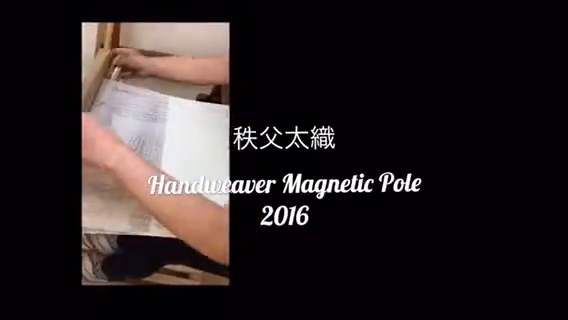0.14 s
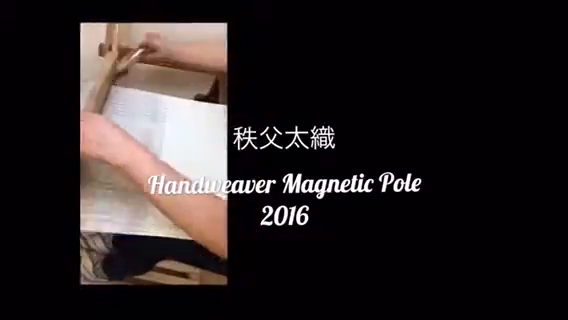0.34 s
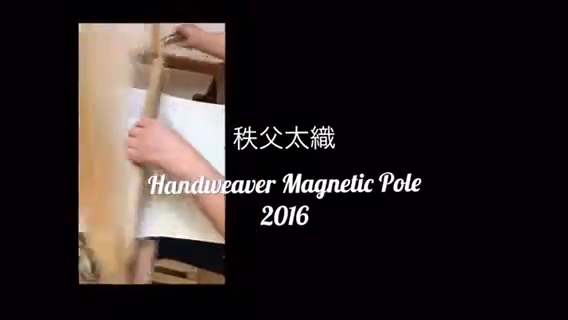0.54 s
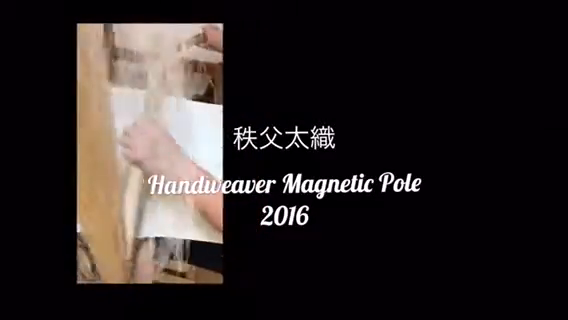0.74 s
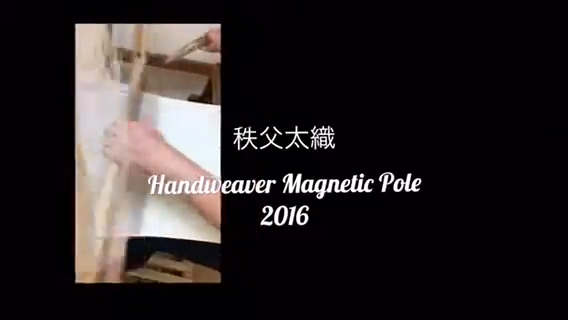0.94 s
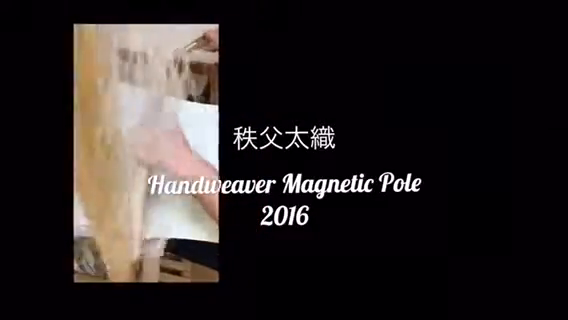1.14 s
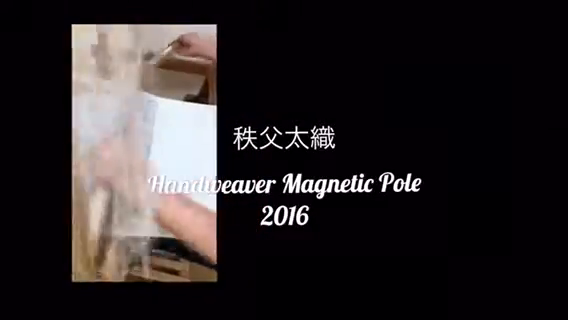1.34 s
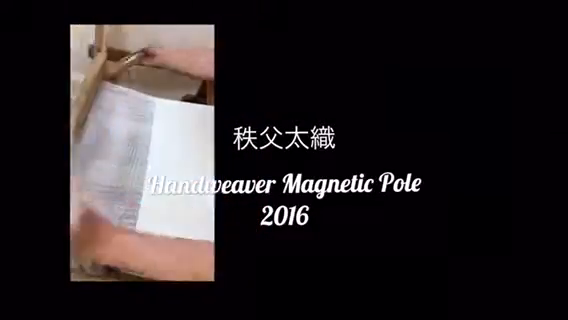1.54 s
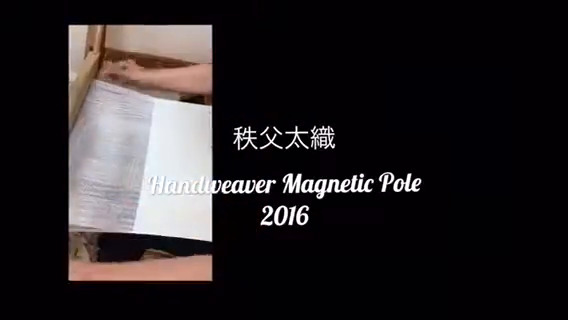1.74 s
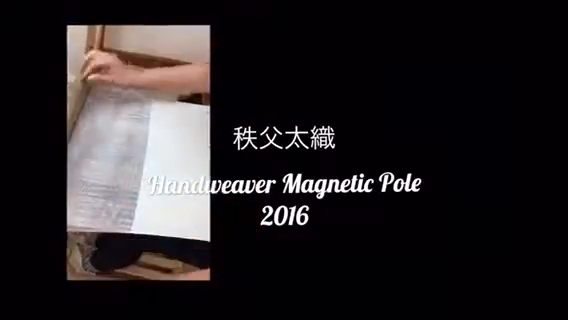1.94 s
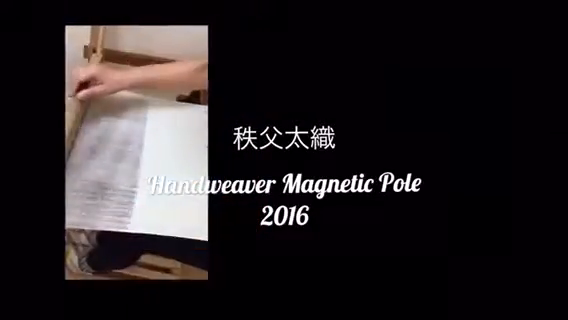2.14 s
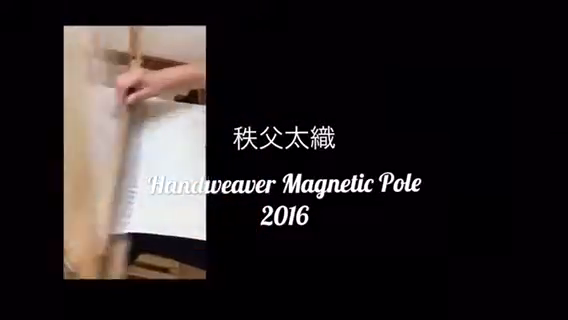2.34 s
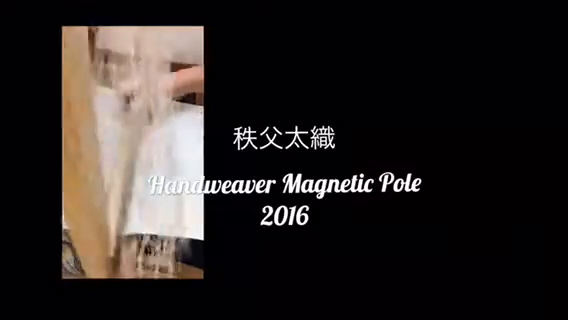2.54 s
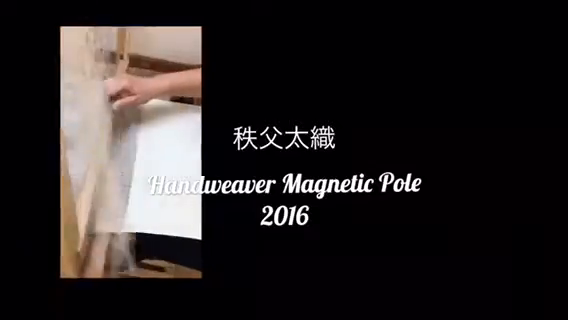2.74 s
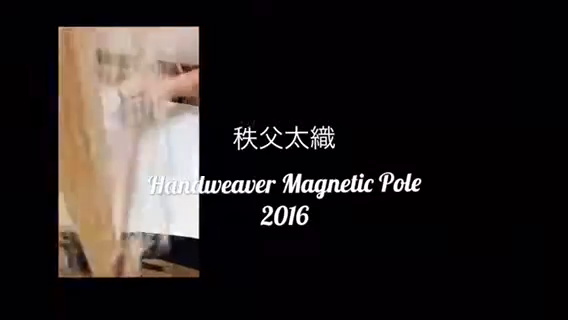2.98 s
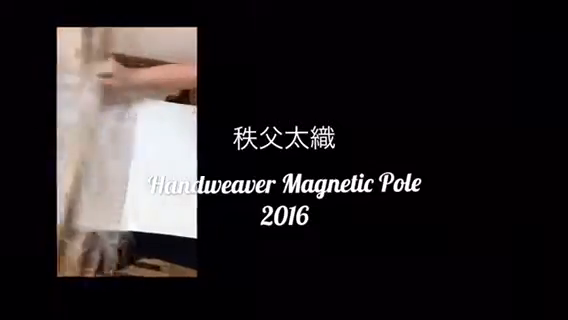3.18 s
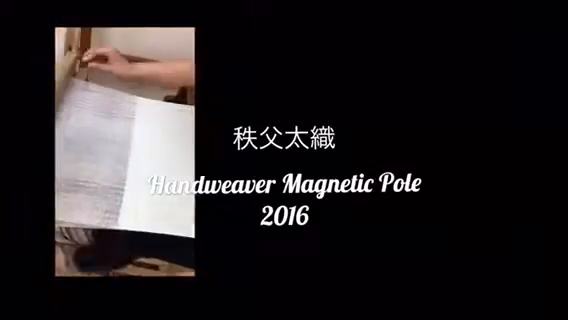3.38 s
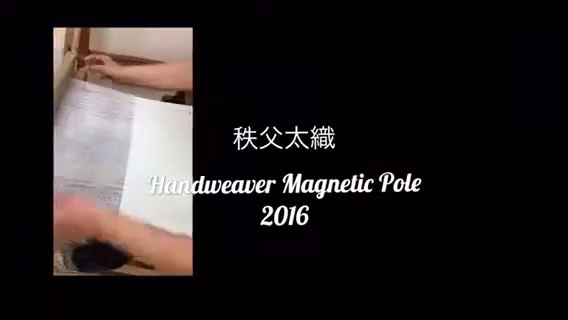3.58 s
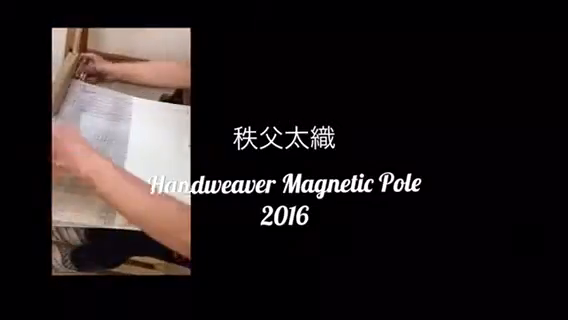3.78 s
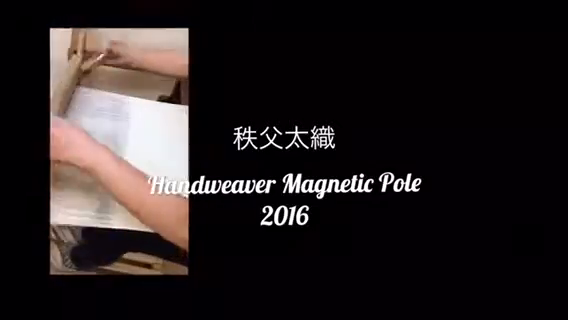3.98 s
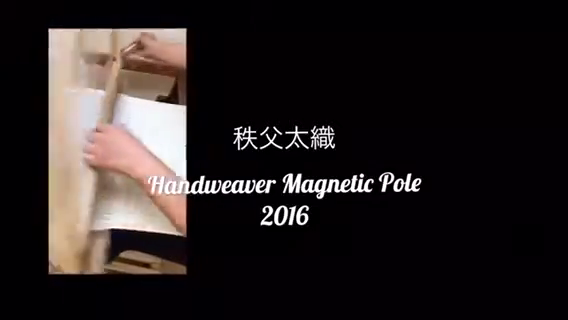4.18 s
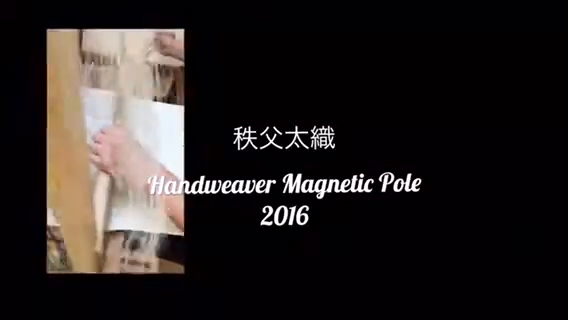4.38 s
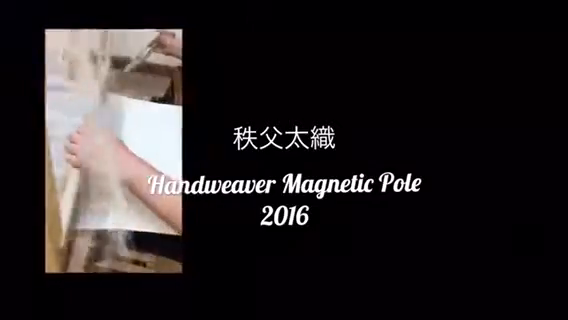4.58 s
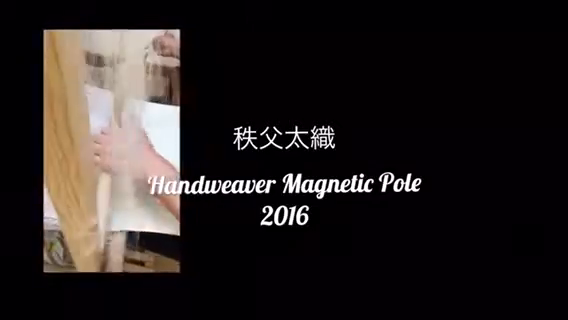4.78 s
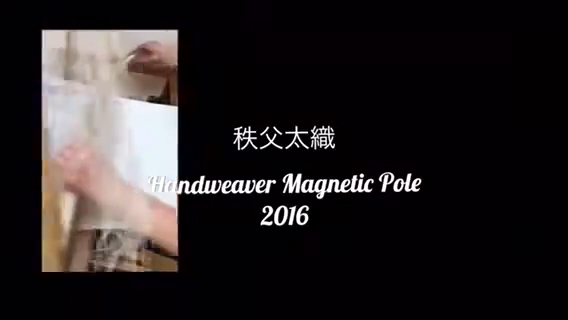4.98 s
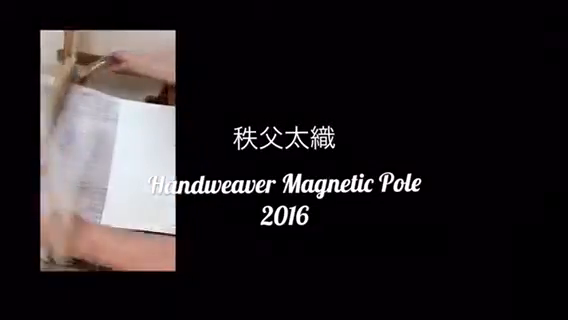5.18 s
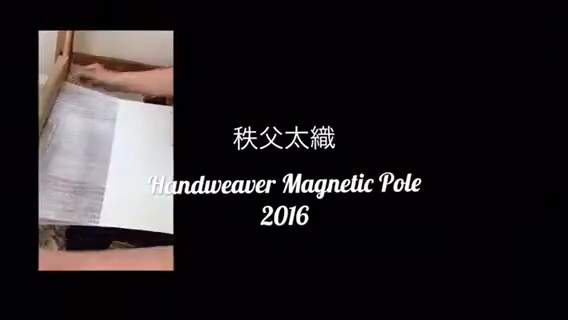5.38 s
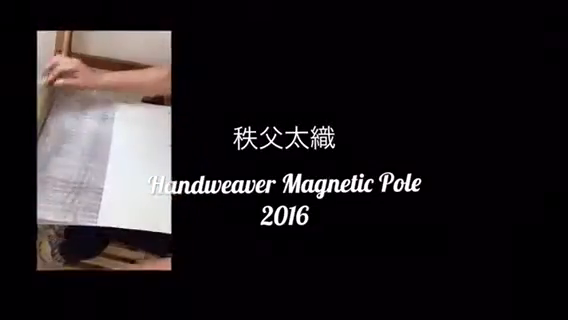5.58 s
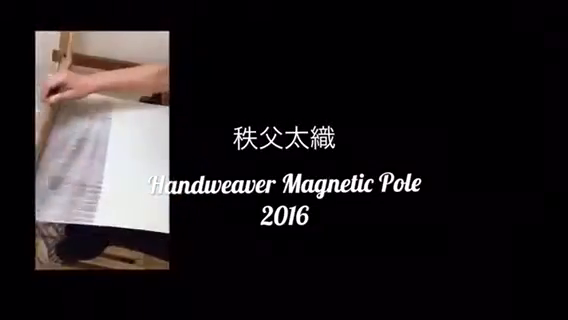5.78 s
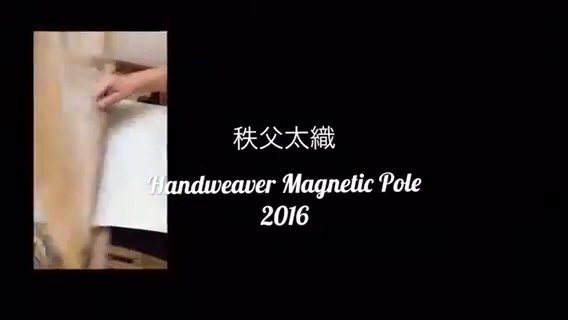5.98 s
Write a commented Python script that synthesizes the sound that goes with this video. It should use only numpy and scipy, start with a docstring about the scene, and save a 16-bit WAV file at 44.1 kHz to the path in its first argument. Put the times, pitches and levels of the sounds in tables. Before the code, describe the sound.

A wooden loom is worked by hand in a small room, heard close on a phone. From 0 to 0.2 seconds, bright clacks rattle over rustling threads, with a soft treadle thud near 0.35. The beater strikes at 0.7 and 1.15: sharp reedy cracks, each followed at once by a deep, wavering frame boom and loose wooden rattle. After a quieter gap, shuttle and heddles clatter quickly from 1.75 to 2.0, then low bumps and a very thin, high pulley squeak around 2.1. Beats land at 2.5 and 2.95. Another clatter and swish runs from 3.5 to 3.85, with thuds about 4.0, then blows at 4.35 and 4.85. A last flurry of clicks and rustle spans 5.3 to 5.65, ending with dull thuds and another faint squeak near 5.75. Quiet low air noise stays steady beneath.

```python
"""Wooden hand loom in a small room

A beater strikes the cloth twice a pick: band-filtered noise cracks for the reed, then the frame booms
as the swing is stopped, as decaying modes driven by half-sine pushes. Between strokes treadles thud,
heddles and shuttle clatter and rustle through the warp (noise through reed and lath resonances),
and a pulley squeaks as a sliding sine. A room tail and steady air noise lie behind; a phone picks it up close.
"""
import sys
import numpy as np
from scipy import signal
from scipy.fft import rfft, irfft, next_fast_len
from scipy.io import wavfile
from scipy.ndimage import uniform_filter1d

SR = 44100
rng = np.random.default_rng(int(sys.argv[2]) if len(sys.argv) > 2 else 0)


def store_pcm(level_fs):
    """Save levels as 16-bit WAV."""
    pcm = np.round(np.clip(level_fs, -1, 1) * 32767).astype(np.int16)
    wavfile.write(sys.argv[1], SR, np.atleast_2d(pcm).T)


N = 265482
T = np.arange(N) / SR


def undb(db):
    """dB to amplitude."""
    return np.exp(np.asarray(db) * np.log(10) / 20)


def unit(x):
    """Scale to RMS 1."""
    return x / np.sqrt(np.mean(x ** 2))


def fade(t, t60_s):
    """Exponential decay, -60 dB at t60_s."""
    return np.exp(-np.log(1000) * t / t60_s)


def colour(x, table):
    """Filter by (Hz, dB) points joined on a log-frequency axis."""
    points_hz, points_db = np.transpose(table)
    size = next_fast_len(x.shape[-1])
    bins_hz = np.maximum(np.arange(size // 2 + 1) * SR / size, 1)
    gain = undb(np.interp(np.log(bins_hz), np.log(points_hz), points_db))
    return irfft(rfft(x, size) * gain, size)[..., :x.shape[-1]]


def band(x, hz, width_hz, order=2):
    """Resonance; applied twice, it leaves dark valleys between neighbours."""
    section = np.concatenate(signal.iirpeak(hz, hz / width_hz, fs=SR))
    return signal.sosfilt([section] * order, x)


def walk(rate_hz):
    """Random levels held 1 / rate_hz s and slewed twice; spread 1."""
    t = T[::16]
    k = max(int(len(t) / T[-1] / rate_hz), 1)
    held = np.repeat(rng.standard_normal(len(t) // k + 1), k)
    slewed = uniform_filter1d(uniform_filter1d(held, k), k)[:len(t)]
    return np.interp(T, t, unit(slewed))


def add(out, start_s, sound):
    """Mix a sound in at start_s, cut at the end of out."""
    i = int(start_s * SR)
    out[i:i + len(sound)] += sound[:N - i]


def pushes(table):
    """Half-sine forces of set impulse; a longer push leaves the high modes quiet."""
    force = np.zeros(N)
    for start_s, level_db, push_ms in table:
        shape = np.sin(np.pi * np.clip(T[:SR // 50] * 1000 / push_ms, 0, 1))
        add(force, start_s, undb(level_db) * shape / shape.sum())
    return force


def swell_db(t, start_s, hold_s, rise_s, fall_s):
    """Climb, hold and sink, straight in dB; rise_s and fall_s per 20 dB."""
    return -20 * np.maximum(np.maximum((start_s - t) / rise_s, (t - start_s - hold_s) / fall_s), 0)


# strokes of the beater: start_s, crack_db, crack_lead_ms, crack_t60_s, knock_db, push_db, second_push_db,
# stop_clack_db, stop_knock_db, stop_lag_ms, stop_knock_hz, rebound_db, push_ms
BEATER_STROKES = [(.684, -4, 5.7, 0.026, -33, -10.5, -8, -22.5, -24, 21.6, 1210, -23.5, 2.4),
                  (1.165, -13.5, 2.94, 0.27, -24.5, -9.5, -46, -45, -20, 27, 1610, -43, 2.6),
                  (2.501, -10, 6.65, .12, -32, -9.5, -9.5, -21, -25, 25.3, 1540, -22.5, 1.6),
                  (2.968, -9.5, 4.8, 0.13, -29.5, -7.5, -41, -31, -29, 27, 970, -23.5, 2.74),
                  (4.344, -7, 7, 0.084, -32.5, -10.5, -8.5, -22, -21, 26.8, 1730, -23.5, 2.2),
                  (4.833, -9.5, 2.67, .15, -31.5, -9.5, -42, -35, -22.5, 23.8, 1740, -53, 3.4)]
SECOND_PUSH_S, SECOND_PUSH_MS = 0.0179, 0.9  # delays _S count from start_s
STOP_S, STOP_DB, STOP_MS = 0.0307, -13.5, 5.67
REBOUND_S, REBOUND_MS = 0.144, 5


def beat_pushes():
    """Reed pushes the frame twice, the second often faint; stop and rebound follow at set delays."""
    reed, stop = [], []
    for start_s, _, _, _, _, push_db, second_db, _, _, _, _, rebound_db, push_ms in BEATER_STROKES:
        reed.append((start_s, push_db, push_ms))
        reed.append((start_s + SECOND_PUSH_S, second_db, SECOND_PUSH_MS))
        stop.append((start_s + STOP_S, STOP_DB, STOP_MS))
        stop.append((start_s + REBOUND_S, rebound_db, REBOUND_MS))
    return pushes(reed), pushes(stop)


# clacks of heddles, shuttle and laths, loud and faint: start_s, crack_db, knock_db, knock_middle_hz
PLACED_CLACKS = [(.0084, -15, -30.5, 3140), (0.059, -12, -41, 3440), (0.0867, -16.5, -35, 3630),
                 (.1364, -10.5, -26.5, 3340), (0.1783, -45, -26, 1850), (0.3137, -33, -51, 3300),
                 (0.335, -23, -47, 3150), (1.1543, -11.5, -30.5, 1260), (1.6134, -61, -44.5, 1160),
                 (1.687, -51, -44, 746), (1.7698, -14.5, -30, 2960), (1.8073, -17, -40, 760),
                 (1.8324, -21.5, -60, 3700), (1.8537, -19, -60, 3320), (1.8687, -12.5, -40, 760),
                 (1.9105, -21, -46, 2750), (1.935, -16, -35, 3040), (1.9522, -14, -33.5, 3450),
                 (1.9654, -15, -53, 3260), (1.978, -8.5, -33, 3340), (1.9942, -27, -26.5, 3360),
                 (2.0081, -23, -30, 860), (2.057, -44.5, -33.5, 1240), (2.107, -36, -42, 3220),
                 (2.146, -34, -39.5, 3200), (2.274, -31, -58, 3370), (2.4704, -22.5, -23.5, 2380),
                 (2.7896, -31, -35, 3600), (2.8375, -42, -38, 1140), (2.9783, -28, -30.5, 2820),
                 (3.3704, -34, -37.5, 1650), (3.4479, -41, -37.5, 750), (3.5348, -23.5, -49, 1200),
                 (3.554, -28.5, -42, 756), (3.5916, -25, -45, 2770), (3.6227, -25.5, -43, 2950),
                 (3.6354, -14.5, -41, 2980), (3.6432, -19, -36, 3110), (3.6717, -18.5, -59, 3010),
                 (3.694, -9.5, -34.5, 3100), (3.7064, -18, -52, 3070), (3.7564, -19, -45, 2800),
                 (3.7716, -14.5, -25.5, 3950), (3.8413, -31, -28.5, 1930), (3.859, -28, -58, 3150),
                 (4.0255, -25.5, -46, 3300), (4.285, -35, -40, 3300), (4.3041, -25, -26.5, 1320),
                 (4.8248, -23, -36, 1340), (5.2596, -51.5, -46.5, 1140), (5.3026, -49, -44, 740),
                 (5.3359, -32.5, -42, 2190), (5.4014, -14, -32, 2400), (5.4103, -23, -34, 780),
                 (5.472, -19, -49, 3430), (5.4867, -14.5, -57, 3580), (5.5029, -16, -34, 3350),
                 (5.5448, -21, -40, 3300), (5.556, -17, -55, 3670), (5.585, -14, -39, 2570),
                 (5.614, -12, -28.5, 3030), (5.636, -21, -31, 3130), (5.6481, -23, -41, 1830),
                 (5.6988, -26, -30, 1700), (5.8016, -13, -29, 3480)]
CLACK_T60_S, STOP_T60_S, REED_KNOCK_HZ = 0.086, 0.34, 1900
# small ticks riding on each thread swell
TICK_OVER_DB, TICK_SCATTER_DB, TICK_KNOCK_DB, TICK_KNOCK_HZ = 5.5, 2.5, -27, 3240


def contacts(ticks_per_swell=2):
    """Rows of start_s, crack_db, knock_db, crack_t60_s, middle_hz: clacks, beater, chance ticks."""
    rows = [(s, crack_db, knock_db, CLACK_T60_S, hz) for s, crack_db, knock_db, hz in PLACED_CLACKS]
    for s, crack_db, lead_ms, t60_s, knock_db, _, _, clack_db, stop_db, lag_ms, hz, *_ in BEATER_STROKES:
        rows.append((s - lead_ms / 1000, crack_db, knock_db, t60_s, REED_KNOCK_HZ))
        rows.append((s + lag_ms / 1000, clack_db, stop_db, STOP_T60_S, hz))
    for s, hold_s, rustle_db, _, rise_s, fall_s, _ in THREAD_SWELLS:
        places = rng.random(ticks_per_swell)
        sizes = rng.standard_normal(ticks_per_swell)
        for place, size in zip(places, sizes):
            at_s = np.clip(s - rise_s / 2 + place * (hold_s + (rise_s + fall_s) / 2), 0, T[-2])
            level_db = rustle_db + swell_db(at_s, s, hold_s, rise_s, fall_s)
            tick_db = level_db + TICK_OVER_DB + TICK_SCATTER_DB * size
            rows.append((at_s, tick_db, tick_db + TICK_KNOCK_DB, CLACK_T60_S, TICK_KNOCK_HZ))
    return rows


# resonances of reed wires and heddles: centre_hz, width_hz, rubbed_db, struck_db
REED_WIRES = [(2580, 300, 0, -31), (3271, 285, 1, 1), (3547, 685, -2.5, 3.5), (4200, 1160, 0, 5),
              (5670, 1120, 3, 8), (6680, 670, 3.5, 9.5), (8735, 2190, 0, 6.5), (9540, 1260, -2.5, 0.5),
              (12800, 4040, -2, 0), (15170, 5860, -4, 2.5)]
# resonances of laths and shuttle: centre_hz, knocked_db, width_hz, rubbed_db
WOOD_LATHS = [(299.7, -3, 84, -2.5), (428, 17, 120, -5), (508, 0, 105, -3), (602, 13, 178, -2.5),
              (735.5, 10, 150, -2), (982, 8, 104, -2.5), (1077, 5.5, 108, -2), (1216, 5.5, 84, -3),
              (1297, 3, 355, -5), (1624, 0.5, 200, -3), (1731, 5.5, 40, -2.5), (1790, 1.5, 184, -1.5),
              (2020, -0.5, 115, -3.5), (2393, -4.5, 253, -5), (2780, -2.5, 190, -10), (3096, -5, 400, -6),
              (3600, 4.5, 170, -21)]
RISE_MS, TICK_DB, TICK_T60_S = 1.56, 3.0, 0.009  # TICK_DB: sharp tick over the crack's slower fall
BOUNCE_SAMPLES = 180


def clacks(rows, strike=9.8, swell_s=0.001416, knock_t60_s=0.03, rattle_db=-13.5, rattle_t60_s=0.34,
           bounce_db=4.0, reach_db=9.5, lath_db=2.0, spread_db=2.5):
    """Each contact is a sharp tick and crack on the reed, and a knock rattling on through loose laths."""
    out, t = np.zeros(N), T[:30 * BOUNCE_SAMPLES]
    chatter = rng.standard_normal((len(rows), len(t)))
    # uneven bounces, each a few ms long
    scatter = rng.standard_normal((len(rows), len(t) // BOUNCE_SAMPLES)).clip(-2, 2)
    bounces = np.repeat(undb(bounce_db * scatter), BOUNCE_SAMPLES, axis=1)
    rattle = undb(rattle_db) * bounces * fade(t, rattle_t60_s)
    chatter *= (1 - np.exp(-t / swell_s)) * (fade(t, knock_t60_s) + rattle)
    chatter[:, int(swell_s * SR)] += strike  # the blow itself rings every lath
    laths = np.array([(-1) ** k * undb(db) * band(chatter, hz, width_hz, order=1)
                      for k, (hz, db, width_hz, _) in enumerate(WOOD_LATHS)])
    hiss = rng.standard_normal(N + len(t))
    wires = np.array([undb(db) * band(hiss, hz, width_hz) for hz, width_hz, _, db in REED_WIRES])
    # each blow favours a few wires and laths
    wire_offsets_db = spread_db * rng.standard_normal((len(rows), len(REED_WIRES)))
    lath_offsets_db = lath_db * rng.standard_normal((len(rows), len(WOOD_LATHS)))

    rise = np.clip(t * 1000 / RISE_MS, 0, 1) ** 2
    after = np.maximum(t - RISE_MS / 1000, 0)
    tick = undb(TICK_DB) * fade(after, TICK_T60_S)
    for k, (start_s, crack_db, knock_db, crack_t60_s, middle_hz) in enumerate(rows):
        fall = fade(after, crack_t60_s) + tick
        crack = unit(undb(wire_offsets_db[k]) @ wires[:, int(start_s * SR):][:, :len(t)])
        add(out, start_s, undb(crack_db - TICK_DB) * rise * fall * crack / 2)
        # laths tuned near middle_hz answer most
        octaves = np.log2(np.array(WOOD_LATHS)[:, 0] / middle_hz)
        knock = undb(-reach_db * octaves ** 2 + lath_offsets_db[k]) @ laths[:, k]
        onset_rms = np.sqrt(np.mean(knock[:SR // 50] ** 2))
        add(out, start_s, undb(knock_db) * knock / onset_rms)
    return out


# treadle thuds: start_s, level_db, push_ms
TREADLE_THUDS = [(.342, -21, 8.1), (2.13, -24.5, 5.6), (4.02, -24.5, 2.3), (5.77, -25.5, 10.2)]
# shafts bumping the frame: start_s, level_db, push_ms
SHAFT_KNOCKS = [(.215, -27, 2.9), (2.005, -29, 2.4), (2.11, -27, 3.3), (2.25, -26, 7.5), (3.90, -23, 5),
                (4.1, -30.5, 5.6), (5.5, -39, 2.4), (5.63, -30, 1.7), (5.73, -25.5, 5.4), (5.86, -34, 2.6)]
# modes of frame and floor: mode_hz, t60_s, swing_sign, reed_db, stop_db, treadle_db, shaft_db
FRAME_MODES = [(37.5, 1, 1, -92, -7.5, -27, -14), (57.6, 0.29, 1, -19, -1, -26, -20),
               (64.7, 0.62, 1, -37, -3.5, -11, -31), (78.47, 0.42, -1, -29, 2.5, -15, -32),
               (84.1, 0.93, -1, -10, -2, -1, -47), (95.8, 0.91, -1, -45, -21.5, -57, -28),
               (121, 0.062, 1, -3.5, -22, -10, -19), (144.5, 0.24, 1, -11.5, -1.5, -22, -26),
               (155.85, 0.5, 1, -12, -11, -9.5, -6.5), (179, 0.04, -1, -4.5, 6, -22, -10),
               (215.2, 0.22, 1, -17.5, 2, -13.5, -38), (237.6, 0.13, -1, -18.5, -15, -33, -55),
               (328, 0.12, 1, -15.5, -14, -28, -40)]


def frame():
    """Decaying modes under four forces; neighbours swing against each other, so the boom swells and beats."""
    forces = np.array([*beat_pushes(), pushes(TREADLE_THUDS), pushes(SHAFT_KNOCKS)])
    out = np.zeros(N)
    for mode_hz, t60_s, swing_sign, *shares_db in FRAME_MODES:
        radius = fade(1 / SR, t60_s)
        angle = 2 * np.pi * mode_hz / SR
        feedback = [1, -2 * radius * np.cos(angle), radius * radius]
        force = undb(shares_db) @ forces
        out += np.sign(swing_sign) * signal.lfilter([0, radius * np.sin(angle)], feedback, force)
    return out


# thread noise: loud as the shuttle passes, softer as the shed changes, faint as the beater swings back:
# full_level_s, hold_s, rustle_db, rub_db, rise_s_per_20db, fall_s_per_20db, tilt_db_per_octave
THREAD_SWELLS = [(0.051, 0.083, -27, -35.5, 0.2, 0.1454, -3), (0.341, 0.1, -36.5, -45, 0.07, 0.28, -4.5),
                 (0.854, 0.31, -52, -56, 0.16, 0.7, 0), (1.901, 0.1, -27.5, -38, 0.17, 0.01, -3),
                 (2.129, 0.1, -33.5, -44.5, 0.17, 0.16, -7), (2.602, 0.19, -43, -50.5, 0.5, 1.1, -3.5),
                 (3.633, 0.14, -31.5, -41, 0.11, 0.36, -5.5), (3.955, 0.11, -37.5, -46.5, 0.29, 0.2, -6),
                 (4.497, 0.35, -56, -54, 0.85, 0.64, 3.5), (5.505, .16, -25.5, -41, 0.1048, 0, -3),
                 (5.798, 0.076, -36.5, -46.5, 0.34, 2.5, -7)]
REST_DB, REST_RUB_DB, REST_TILT_DB = -63, -69.5, -7  # threads at rest; tilt per octave
BEAT_RUB_DB, SETTLE_T60_S = -35, 0.69  # threads settling after a stroke
SWEEP_DB, SWEEP_RUB_DB, SWEEP_S = -39.5, -38.5, 0.053  # reed combs the warp before a stroke; 20 dB rise


def threads():
    """Rustle gain, rub gain and tilt: rest, settling after strokes, swells and reed sweeps."""
    t = T[::64]
    settle = sum((t > b[0]) * fade(np.maximum(t - b[0], 0), SETTLE_T60_S) for b in BEATER_STROKES)
    rustle = undb(REST_DB)
    rub = undb(REST_RUB_DB) + undb(BEAT_RUB_DB) * settle
    weighted_tilt = REST_TILT_DB * undb(REST_DB)
    sweeps = [(b[0], 0, SWEEP_DB, SWEEP_RUB_DB, SWEEP_S, SWEEP_S / 2, REST_TILT_DB) for b in BEATER_STROKES]
    for start_s, hold_s, rustle_db, rub_db, rise_s, fall_s, tilt_db in THREAD_SWELLS + sweeps:
        shape = undb(swell_db(t, start_s, hold_s, rise_s, fall_s))
        rustle = rustle + undb(rustle_db) * shape
        rub = rub + undb(rub_db) * shape
        weighted_tilt = weighted_tilt + tilt_db * undb(rustle_db) * shape
    return (np.interp(T, t, curve) for curve in (rustle, rub, weighted_tilt / rustle))


SLIPS_PER_S, SLIP_SCATTER_DB, SLIP_S = 500.0, 4.5, 0.001


def drag(smooth=0.96):
    """Uneven slips of thread, smeared with hiss, through reed resonances and through the laths."""
    rustle_gain, rub_gain, tilt_db = threads()
    sizes = undb(SLIP_SCATTER_DB * np.minimum(rng.exponential(size=N), 2.5))
    slips = sizes * (rng.random(N) < SLIPS_PER_S / SR)
    smear = np.sqrt(signal.lfilter([1], [1, -np.exp(-1 / (SLIP_S * SR))], slips ** 2))
    slip_noise = (unit(smear) + smooth) * rng.standard_normal(N)
    wires = np.array([undb(db + 3.04 * walk(45)) * band(slip_noise, hz, width_hz)
                      for hz, width_hz, db, _ in REED_WIRES])
    octaves = np.log2(np.array(REED_WIRES)[:, :1] / 5000)
    untilted_rms = np.sqrt(np.mean(wires.sum(axis=0) ** 2))
    rustle = np.sum(undb(tilt_db * octaves) * wires, axis=0) / untilted_rms
    rub = sum(undb(db + 3.8 * walk(25.28)) * band(slip_noise, hz, width_hz)
              for hz, _, width_hz, db in WOOD_LATHS)
    return rustle_gain * rustle + rub_gain * unit(rub)


# pulley squeaks: start_s, hold_s, level_db
PULLEY_SQUEAKS = [(2.077, .14, -32), (5.731, 0.13, -30.5)]
SQUEAK_HZ, SQUEAK_SLIDE_HZ, SQUEAK_SLIDE_S = 11270, 350, 0.1
SQUEAK_ATTACK_S, SQUEAK_DROP_DB, SQUEAK_T60_S = 0.023, -8, 0.48
UNDERTONE_HZ, UNDERTONE_DB = 171, -8  # weaker line this far below the tone, while it holds


def squeaks(wobble_hz=35.0, flutter_db=3.5):
    """Thin, slightly rough whistle: slides upward as the pulley turns, holds, trails off softer."""
    out = np.zeros(N)
    wobble = wobble_hz * walk(390)
    flutter = undb(flutter_db * walk(70))
    for start_s, hold_s, level_db in PULLEY_SQUEAKS:
        t = np.maximum(T - start_s, 0)
        pitch_hz = SQUEAK_HZ + SQUEAK_SLIDE_HZ * np.tanh(t / SQUEAK_SLIDE_S) + wobble
        phase = 2 * np.pi * np.cumsum(pitch_hz) / SR
        hold = uniform_filter1d(1.0 * (t < hold_s), size=400)
        trail = (1 - hold) * undb(SQUEAK_DROP_DB) * fade(np.maximum(t - hold_s, 0), SQUEAK_T60_S)
        undertone = hold * undb(UNDERTONE_DB) * np.sin(phase - 2 * np.pi * UNDERTONE_HZ * T)
        tone = (hold + trail) * np.sin(phase) + undertone
        attack = np.clip(t / SQUEAK_ATTACK_S, 0, 1) ** 2
        out += np.sqrt(2) * undb(level_db) * flutter * attack * tone
    return out


ROOM_DB, ROOM_LOW_T60_S, ROOM_BROAD_T60_S = -12, 0.25, 0.46


def room(x):
    """Dense reflections as a noise tail; a share below 2500 Hz dies sooner than the broadband one."""
    t = T[:SR // 2]
    low, broad = rng.standard_normal((2, len(t)))
    low = signal.lfilter(*signal.butter(1, 2500, fs=SR), low) * fade(t, ROOM_LOW_T60_S)
    tail = low + 0.72 * broad * fade(t, ROOM_BROAD_T60_S)
    reflections = tail * (t > 0.004) / np.sqrt(np.sum(tail ** 2))
    return undb(ROOM_DB) * signal.fftconvolve(x, reflections)[:N]


# spectrum shape of the air noise: point_hz, relative_db
AIR_SPECTRUM = [(15, -29), (36, 0), (87, 1), (170, -3), (373, -19), (1070, -36), (1400, -29), (1740, -24),
                (4370, -27), (4870, -47.5), (6050, -37), (14400, -24), (16000, -56)]
AIR_DB = -46.5


def air():
    """Steady background: shaped noise, its level drifting slightly."""
    noise = colour(rng.standard_normal(N), AIR_SPECTRUM)
    return undb(AIR_DB + 0.13 * walk(5.85)) * unit(noise)


def scene():
    """Contacts, threads and squeaks with room tail; frame and air without."""
    near = clacks(contacts()) + drag() + squeaks()
    return (near + room(near) + frame() + air())[None]


TOP_HZ = 15400


def record(dry):
    """The phone loses the deepest bass, rounds the loudest cracks and cuts the top."""
    highpass = signal.butter(4, 30.0, "high", fs=SR, output="sos")
    rounded = np.tanh(1.2 * signal.sosfilt(highpass, dry)) / 1.2
    lowpass = signal.ellip(8, 0.2, 70, TOP_HZ, fs=SR, output="sos")
    return signal.sosfilt(lowpass, rounded)


dry = scene()
out = record(dry)
store_pcm(out)
```